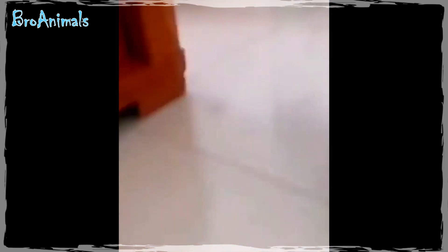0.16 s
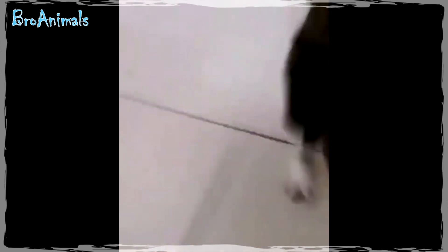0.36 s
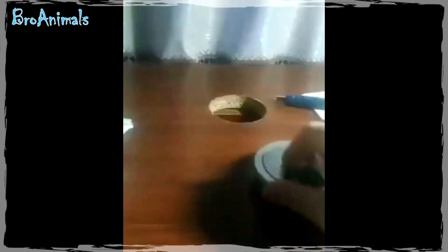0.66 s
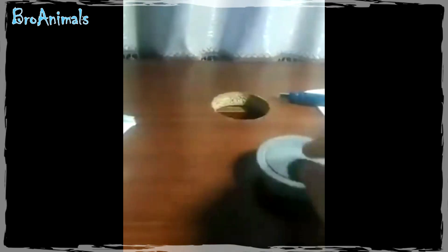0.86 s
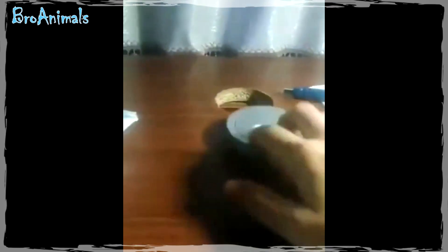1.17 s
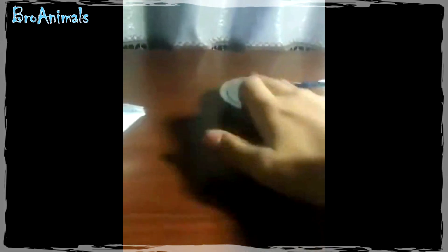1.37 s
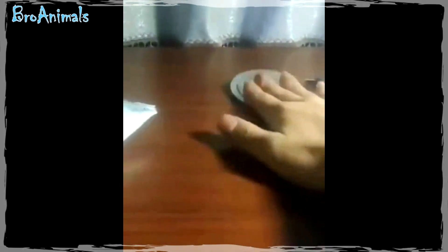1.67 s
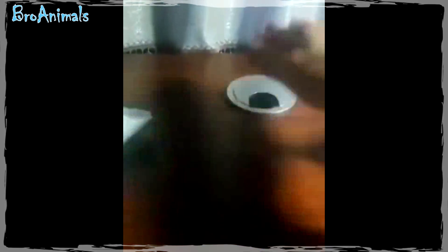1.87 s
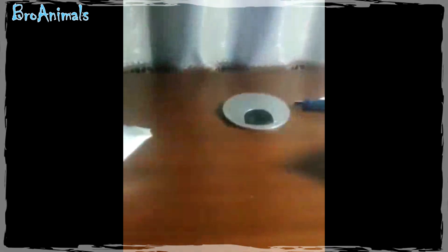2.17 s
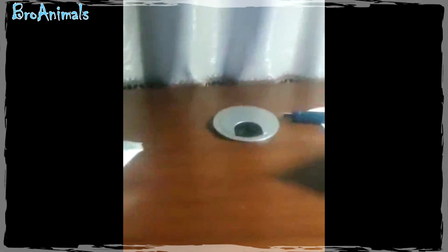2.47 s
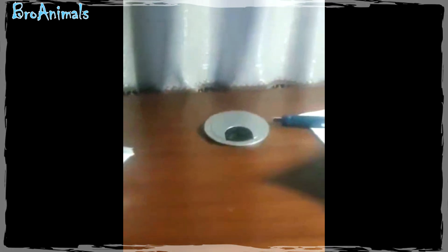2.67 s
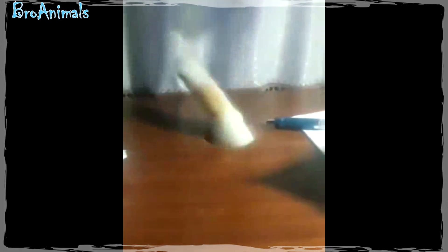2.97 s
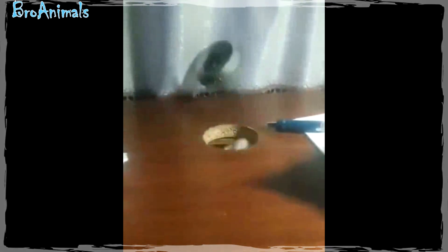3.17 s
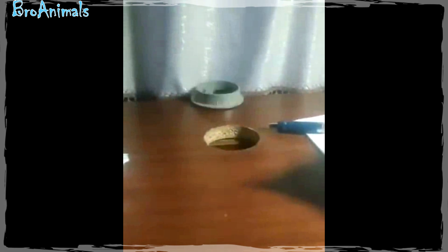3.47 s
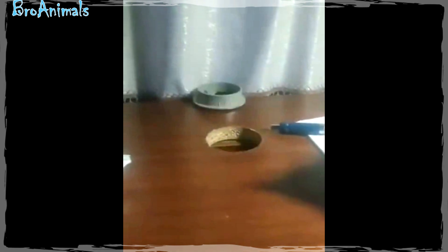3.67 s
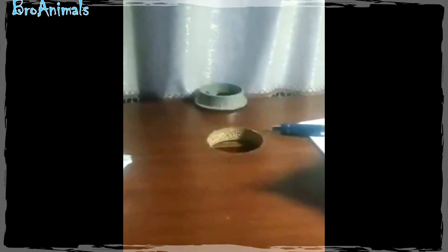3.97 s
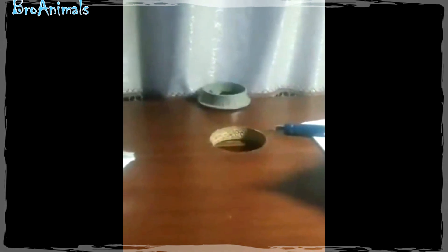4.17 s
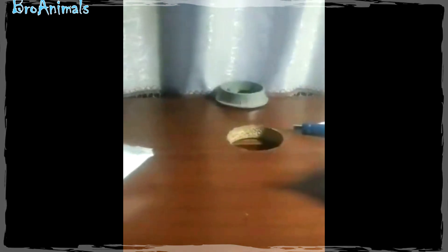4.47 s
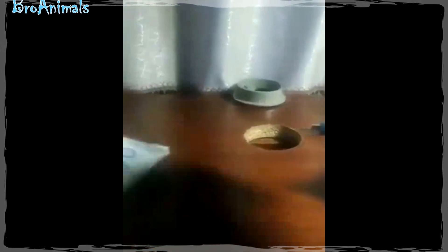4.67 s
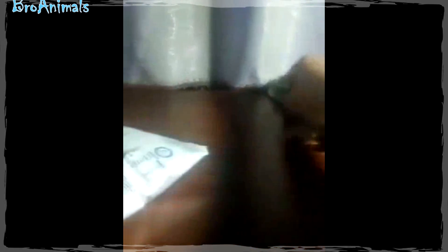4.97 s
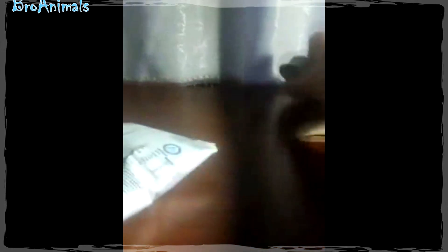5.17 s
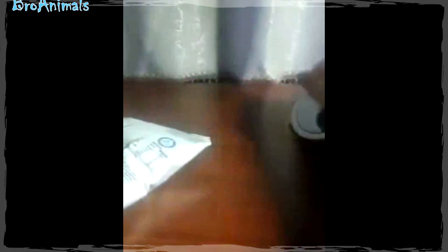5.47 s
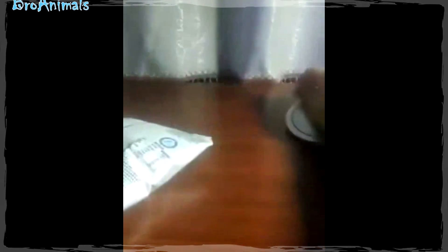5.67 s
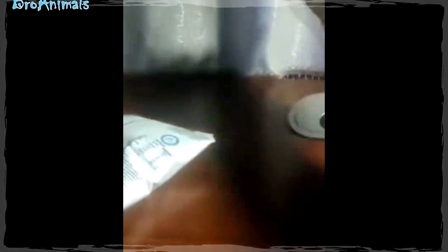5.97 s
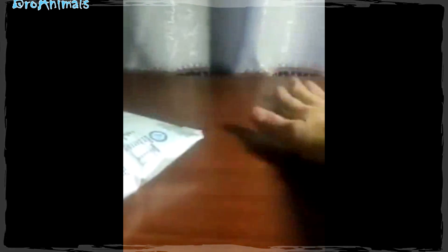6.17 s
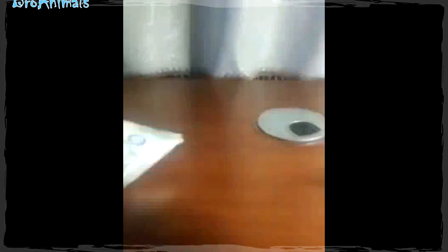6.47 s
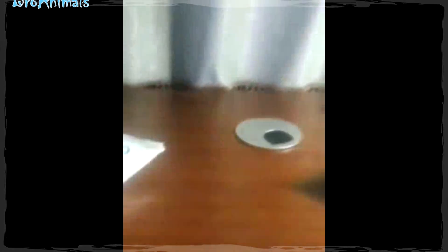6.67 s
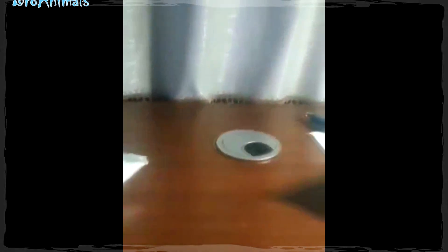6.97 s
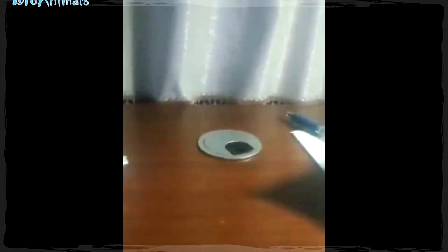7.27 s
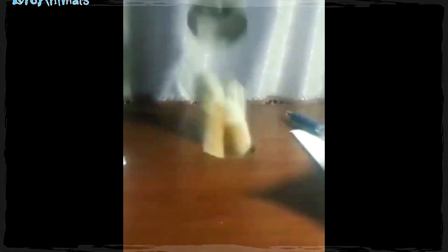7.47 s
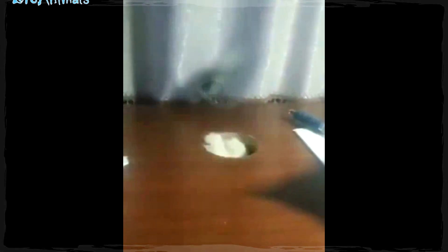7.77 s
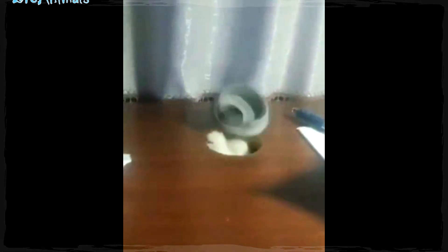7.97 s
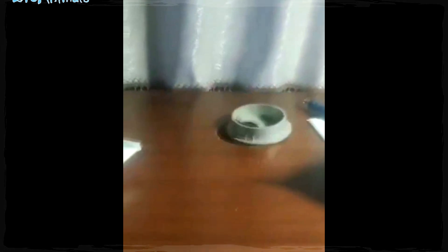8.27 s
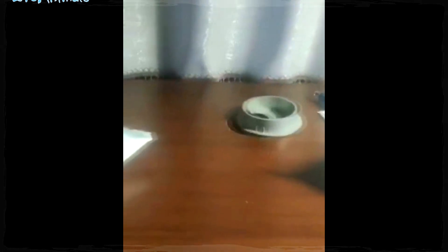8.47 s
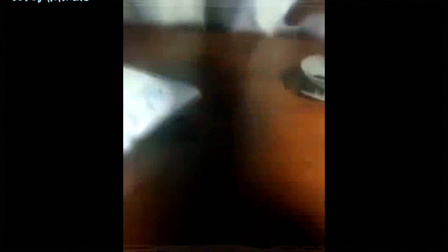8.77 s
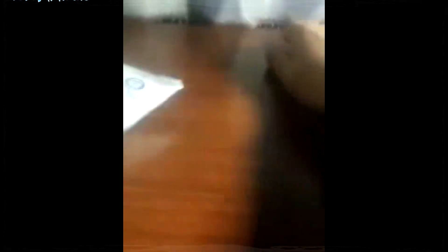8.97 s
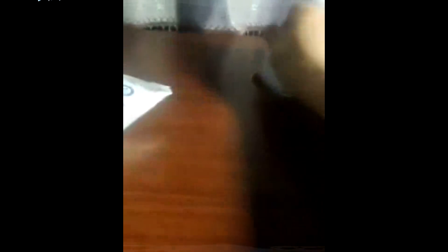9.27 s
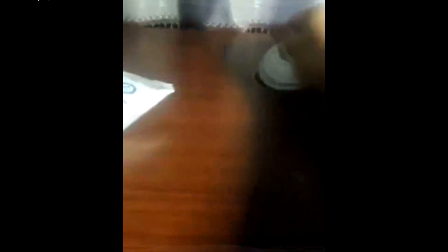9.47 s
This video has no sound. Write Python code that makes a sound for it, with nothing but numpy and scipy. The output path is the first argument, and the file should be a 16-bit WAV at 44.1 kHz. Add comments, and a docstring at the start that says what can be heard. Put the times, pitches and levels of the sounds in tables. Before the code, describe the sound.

A hollow plastic cap slides and clacks into a hole in a wooden desk, then twice gets scratched, popped out, rattles and is fetched, close in a small hard room.

```python
"""After half a second of silence a blink of room tone is heard, a second gap, then a drone and a hollow rasp:
a hand slides a plastic cable-hole cap over a wooden desk, close to a phone, and presses it into its hole.
Twice a cat's paw scratches it from below and pops it out; it bounces and rattles, and the hand fetches it.
Knocks are struck damped modes, scrapes are stick-slip noise driving such modes, the slide is filtered
stick-slip noise; a small hard room adds decaying noise and standing waves, and filtered noise is the air."""
import sys
import numpy as np
from scipy import signal
from scipy.fft import rfft, irfft
from scipy.io import wavfile
from scipy.ndimage import uniform_filter1d, minimum_filter1d, map_coordinates

SR = 44100
rng = np.random.default_rng(int(sys.argv[2]) if len(sys.argv) > 2 else 0)


def unload_wav(signal):
    """Save mono or channel-first audio to the path in sys.argv[1] as 16-bit WAV at rate SR, clipped to [-1, 1]."""
    wavfile.write(
        sys.argv[1],
        SR,
        np.round(np.clip(np.atleast_2d(signal).T, -1, 1) * 32767).astype(np.int16),
    )


N = 424241
T = np.arange(N) / SR

# Levels of events are relative; each layer adds its own trim.
# Cap meets desk: pressed home, popped out, put back, flung up again, fetched. Columns: t/s, contact length/s,
# focus/dB (lost one octave from a centre), cap level/dB, cap centre f/Hz, desk thud level/dB, thud centre f/Hz,
# skirt level/dB, rim crack level/dB, edge tick level/dB
KNOCKS = [ (1.086,0.0019,17,-17.5,1840,-21.5,330,-30.5,-31.5,-45),
          (1.123,.003,11,-29,1600,-36,380,-55,-49,-48), (1.22,0.0017,7.5,-18,1580,-21,414,-30,-26,-31.5),
          (1.301,0.0025,14,-33,982,-36,382,-59,-42,-42), (1.35,0.0021,5,-19.5,1700,-16,443,-40,-24.5,-24),
          (1.357,0.0025,17,-30.5,1500,-15,476,-39,-25,-35), (1.364,0.0022,8,-28,1100,-31,560,-43,-33,-39),
          (1.372,.002,7,-23.5,870,-16.5,272,-48,-37,-46),
          (1.532,0.0009,8,-20.5,1880,-24.5,563,-35,-25,-28.5),
          (2.065,0.0023,9.5,-47.5,880,-29.5,234,-62,-56,-41),
          (2.547,0.0028,7,-27,1700,-22,344,-33,-29.5,-25.5),
          (2.655,0.0037,2,-54,1520,-51,400,-55,-28,-22.5), (2.704,0.002,14,-26,2030,-28.5,400,-33,-28,-26),
          (2.779,0.0016,15,-36,750,-33.5,367,-50,-30,-27.5), (2.807,.002,6,-29,1210,-32,440,-38,-28,-34),
          (2.849,0.0016,13,-43,1630,-45,310,-46,-27.5,-41),
          (2.898,0.0015,12,-33,1660,-30,390,-52,-23,-31.5),
          (2.906,0.002,2,-15,1160,-18,480,-19,-24.5,-22.5),
          (3.045,0.0019,8,-19.5,1800,-26,506,-18.5,-21,-27),
          (3.064,0.0034,10,-40,1500,-26,480,-47,-35,-24.5), (3.148,0.0025,7,-31,1600,-30,400,-29,-28,-31),
          (3.151,0.0017,4,-21.5,1710,-26.5,480,-18,-23,-32),
          (3.183,0.0035,13,-29.5,1800,-26,350,-42,-38,-44),
          (3.197,0.0011,6,-23,1240,-19.5,440,-26.5,-23,-34),
          (3.205,0.0019,4,-23,750,-22.5,620,-25,-19.5,-28), (3.216,0.0018,19,-28.5,780,-26,690,-43,-37,-29),
          (3.298,0.0016,4,-32,1470,-35,458,-42,-42,-41), (4.141,.002,17,-71.5,910,-40,300,-85,-76.5,-80),
          (4.727,.003,3,-37,994,-29,377.5,-55,-57,-62), (4.766,0.00082,11,-42,1500,-24.5,410,-58,-36,-32.5),
          (4.815,0.002,5.5,-25,1802,-22.5,680,-23.5,-27.5,-34),
          (4.821,0.0014,15,-27,1600,-20.5,570,-56,-53,-53),
          (4.932,0.0024,69,-28.5,1270,-28.5,515,-44,-48,-55),
          (4.99,0.0015,6,-55,1361,-59,250.3,-43,-39,-38),
          (5.226,0.0015,8.5,-25.5,1630,-15,283,-40,-27.5,-28.5),
          (5.324,0.0028,9,-37.5,1307,-29,400,-56,-40,-45), (5.35,.002,9,-28.5,952,-21,294,-47,-37.5,-43),
          (5.398,0.0018,12,-21.5,1760,-22.5,431,-28,-21,-26), (5.412,.0015,12,-38,1790,-30,400,-45,-40,-42),
          (5.444,0.0022,7,-28.5,1210,-25,480,-46,-31.5,-36), (5.453,0.0025,9,-33,1211,-24,638,-50,-39,-41),
          (5.856,0.0029,5,-20,1602,-19,410,-25,-22,-22.5), (5.863,0.0028,11,-21,1763,-21.5,600,-29,-31,-36),
          (5.871,0.0012,2.5,-21.5,1401,-15.5,229,-35,-28,-42.5),
          (6.38,0.0025,12,-69,835,-40,318,-74,-66,-76.5), (6.583,0.0021,4,-52,741,-33,233.2,-57,-50,-42),
          (7.166,0.0027,7,-25,1514,-24.5,345,-34,-26.5,-27),
          (7.174,0.0012,0,-26,1420,-27.5,646,-49,-38,-37), (7.187,0.00088,6,-56,1611,-42,400,-54,-32,-30),
          (7.339,.0017,1,-32.5,1708,-36,417,-44,-28,-36),
          (7.345,0.00082,16,-29.5,1608,-32,420,-48,-26.5,-36),
          (7.454,0.0019,1,-25,1212,-29,370,-44,-27.5,-42), (7.566,.0016,4.5,-19.5,1120,-19,490,-24,-19,-26),
          (7.577,.002,9,-22.5,900,-26,326.2,-50,-45,-45), (7.594,0.0015,9,-19,778,-22,440,-50,-30,-28.5),
          (7.718,0.0016,7.5,-18,1551,-24,420,-22.5,-27.5,-24.5),
          (7.739,0.0037,11,-23.5,1580,-26,385,-43,-34,-32), (7.754,0.0019,8,-27,1548,-22,380,-44,-43,-29),
          (7.772,0.0023,13,-18.5,1580,-20.5,520,-36,-33,-39),
          (7.851,0.0019,7,-21.5,1205,-18,380,-43,-33,-35), (7.86,0.0016,21,-24,877,-18.5,430,-49,-37,-48),
          (7.906,0.0029,6,-22,1150,-19,350,-50,-40,-38),
          (7.928,0.0014,7.5,-18,1010,-19.5,413,-27.5,-24.5,-24.5),
          (8.016,0.0021,10,-29,1750,-26,351,-41,-49.5,-48.5),
          (8.042,0.0024,1.5,-26,1212,-29.5,420,-37,-48,-38.5),
          (8.059,0.0028,2,-22.5,792,-25,470,-34.5,-35.5,-38.5),
          (8.547,0.0013,10,-45,1501,-38,320.4,-57,-34,-27.5), (8.56,0.004,1,-31.5,1592,-33,280,-45,-37,-45),
          (8.65,0.0014,8,-30,1600,-43,400,-42,-27,-30), (8.655,0.0019,1,-27,1210,-23,503,-28.5,-27.5,-33),
          (8.668,.002,6,-28,1400,-23,308,-31,-47,-42), (8.707,0.0028,9,-28,752,-21.5,369.4,-37,-44,-48),
          (8.8,.002,28,-34.5,1310,-51,400,-50,-49,-26), (8.955,0.0027,5,-25.5,850,-13.5,404,-59,-36,-32.5),
          (8.973,0.0016,9,-26,950,-12.5,463,-56,-33.5,-42), (9.021,0.0024,6,-47,900,-33,399,-52,-38,-37),
          (9.059,0.0029,6,-35,1262,-24.5,319.8,-52,-36,-29),
          (9.109,0.0021,10,-33.5,1156,-21,335,-53,-40,-41),
          (9.221,.0016,8,-27,1432,-20.5,344.4,-42,-29,-33),
          (9.372,0.0017,11,-24,1348,-20.5,400,-45,-29.5,-38),
          (9.429,0.0046,11,-23.5,950,-23.5,411,-55,-33,-44),
          (9.446,0.0014,7,-27,1006,-26,301.5,-34,-28,-39), (9.497,0.0019,15,-32,1148,-34,546.6,-44,-56,-48),
          (9.506,0.0017,22,-29,1140,-36,546,-58,-50,-52)]
# Strokes of claws, fingers and rim. Columns: start t/s, length/s, cap level/dB, cap centre f/Hz,
# desk rumble level/dB, rumble centre f/Hz, edge hiss level/dB
SCRAPES = [ (0.787, 0.098, -23.5, 1310, -26, 250, -48), (0.937, 0.12, -20.5, 1240, -27, 454, -58),
           (1.337, 0.044, -29, 1500, -29, 480, -38), (2.033, 0.15, -46.5, 1220, -40.5, 230, -50.5),
           (2.606, 0.083, -45, 2830, -59, 240, -43), (2.691, 0.12, -30, 1900, -44, 322, -33.5),
           (2.833, 0.026, -26, 3670, -32, 342, -29), (2.925, 0.16, -20.5, 1000, -23, 233, -46),
           (3.051, 0.12, -27.5, 1300, -28, 300, -38.5), (3.248, 0.16, -43, 895.5, -26, 260, -71),
           (4.6, 0.33, -40, 2744, -47.5, 217.4, -46.5), (4.889, 0.097, -25, 1210, -26, 576, -37.5),
           (5.407, 0.1, -23.5, 1000, -20, 383, -39.5), (5.002, 0.39, -57, 2400, -65, 260, -56),
           (5.673, 0.18, -48, 2800, -56.5, 259.6, -57.5), (5.881, 0.19, -28, 1179, -20.5, 188, -57),
           (5.562, 0.1, -35, 1480, -27.5, 285, -52), (6.594, 0.096, -35.5, 1309, -38, 252, -45),
           (6.743, 0.077, -44, 1257, -40.5, 235, -51), (7.161, 0.028, -27, 2776, -43, 223, -28),
           (7.342, 0.059, -31, 815, -22, 304, -32.5), (7.394, 0.069, -32, 2000, -27, 328.4, -28),
           (7.627, 0.1, -23, 909.2, -24, 375, -40), (7.786, 0.044, -20, 3200, -28.5, 299.7, -32.5),
           (7.965, 0.059, -24.5, 728.6, -30, 247.6, -41), (8.608, 0.15, -27.5, 1440, -29.5, 318, -37.5),
           (8.765, 0.071, -45, 1303, -39, 229.9, -39), (8.791, 0.025, -24.5, 1400, -41, 301.4, -35),
           (8.975, 0.13, -28.5, 830, -44, 270, -43.5), (9.19, 0.045, -31, 1297, -16.5, 260.6, -41),
           (9.335, 0.041, -38, 920, -23.5, 328.4, -52), (9.384, 0.072, -29.5, 1000, -20, 380, -45),
           (9.456, 0.077, -32, 1096, -26.5, 307.6, -45)]
# The hand pushes the cap flat over the wood. Columns: start t/s, stop t/s, rasp level/dB, desk rumble level/dB
PUSHES = [(0.66, 1.06, -25.5, -29.5), (1.066, 1.222, -30, -26), (1.288, 1.333, -21.5, -17.5)]

# Modes of the cap's flat face. Columns: f/Hz, level/dB
FACE_MODES = [(750, -4), (882, -4.5), (1010, -6.5), (1190, -3.5), (1445, -3.5), (1605, -2), (1720, -3),
              (1840, -1), (2100, 0.5), (2520, -2.5)]
# Modes of the cap's skirt, which rings when no hand or hole holds it. Columns: f/Hz, level/dB
SKIRT_MODES = [(2600, -2), (3010, 3), (3160, -8.5), (3400, -1.5), (3850, -4), (4340, -14.5), (4957, -11.5)]
# Modes of the desk top. Columns: f/Hz, level/dB
DESK_MODES = [(205, -6), (236, -3.5), (258, -3), (325, -5.5), (355, -4), (400, 0.5), (470, -4.5), (520, -3),
              (574, -2), (675, 0), (742, 2)]
# Spectrum of the struck rim. Columns: f/Hz, level/dB
RIM_CRACK = [(500, -33), (1700, -9), (2500, -0.5), (3010, -4.5), (3400, -5), (4300, -2), (4957, -1.5),
             (5600, -6.5), (9000, -17.5)]
# Spectrum of the struck edge. Columns: f/Hz, level/dB
EDGE_TICK = [(1000, -15), (4000, -20.5), (5600, -9.5), (6800, 0), (8000, -0.5), (9100, -9), (10500, 1.5),
             (14000, -8.5)]
# Spectrum of the cap's thin edge when scraped. Columns: f/Hz, level/dB
EDGE_HISS = [(2500, -7.5), (3500, -6), (4400, -6.5), (5600, -8), (6800, -7), (8000, -8.5), (9100, -12),
             (10500, -10.5), (14000, -14)]
# Spectrum of the gliding cap's hollow. Columns: f/Hz, level/dB
SLIDE_HOLLOW = [(500, -35), (720, -6.5), (900, 0), (1050, -5), (1300, -33)]
# Spectrum of the gliding rim. Columns: f/Hz, level/dB
SLIDE_RASP = [(900, -36), (1250, -8), (1560, -1.5), (1780, 1.5), (2150, -14.5), (2550, 0), (2850, -23),
              (3150, -11.5), (4000, -32)]
# Spectrum of the rubbed desk. Columns: f/Hz, level/dB
DESK_RUMBLE = [(100, -25.5), (160, -17.5), (230, 4.5), (290, 4.5), (390, 7.5), (500, -10), (700, -4),
               (950, -17)]

# Decay of the diffuse echo. Columns: f/Hz, t60/s
ROOM_T60 = [(100, 1.4), (220, 0.5), (400, 0.435), (1500, .5), (4000, 0.51), (7000, 0.46), (12000, 0.63)]
# Spectrum of the diffuse echo. Columns: f/Hz, level/dB
ROOM_COLOUR = [(100, -8), (220, -2), (400, -1), (800, -2), (1600, -2.5), (4000, -2.5), (7000, -2.5),
               (12000, -6.5)]
# Standing waves of the room. Columns: f/Hz, t60/s, level/dB
ROOM_MODES = [(199, .55, 1.5), (217.7, 0.29, 3), (237.2, .4, 3), (257.5, 0.37, 5.5), (333.7, 0.24, -3),
              (353, 0.26, -6), (397.6, 0.42, 1.5), (421, 0.25, -2), (571, 0.32, 0), (680, 0.25, 2),
              (737, .4, 2), (901, .4, 0.5)]
# Spectrum of the indoor drone and hiss. Columns: f/Hz, level/dB
AIR = [(24, -89), (40, -57), (140, -18), (170, -3), (192, 0.5), (239, -1.5), (264, -12), (363, -13),
       (476, -17.5), (721, -20.5), (1020, -22), (1400, -27), (7590, -29), (9460, -29), (14000, -73.5)]
# Spans in which sound is let through, with silence outside. Columns: from t/s, to t/s
LIVE = [(.548, .575), (.697, 9.7)]

DESK_Q, CAP_Q, SKIRT_Q = 8, 13, 26  # wood and soft plastic ring for few cycles
CAP_DETUNE = .012  # the grip shifts the cap's modes by this share
STROKE_RISE, STROKE_FALL = 0.13, 0.31  # shares of a stroke spent speeding up and stopping
GRIP_DB, GRIP_PER_S = 3, 100  # the grip tightens and loosens at random
GRIP_SHIFT_S = .03  # a rubbed body answers with a new mix of its modes about this often
PUSH_START_SHARE = 0.34  # speed at the outset, as a share of full speed
PUSH_SPEEDUP_S, PUSH_EDGE_S = 0.28, 0.041  # time constant of speeding up; smoothing of start and stop
SLIDE_WANDER, SLIDE_FLICKER_DB = .035, 2  # wander of the resonances, as a share, and of their level
TOP_HZ = 15800  # next to no sound above this frequency


def knocks(cap_db, thud_db, skirt_db, crack_db, tick_db):
    """Impact excitation: each contact ticks the edge, cracks the rim and rings face, skirt and desk top."""
    out, t = np.zeros(N), T[:SR // 12]
    for (s, contact_s, focus_db, face_level, face_hz, desk_level, desk_hz,
         skirt_level, rim_level, edge_level) in KNOCKS:
        face, desk = bodies(t, FACE_MODES, face_hz, desk_hz, focus_db, focus_db, contact_s)
        skirt = ring(SKIRT_MODES, t, SKIRT_Q, centre_hz=3200, focus_db=2.5, scatter_db=-0.5, detune=0.0081)
        skirt = skirt * (1 - np.exp(-t / contact_s))
        rim = chatter(RIM_CRACK, t, contact_s)
        edge = chatter(EDGE_TICK, t, contact_s)
        add(out, s, blow(face, face_level + cap_db))
        add(out, s, blow(desk, desk_level + thud_db))
        add(out, s, blow(skirt, skirt_level + skirt_db))
        add(out, s, blow(rim, rim_level + crack_db))
        add(out, s, blow(edge, edge_level + tick_db))
    return out


def bodies(t, cap_modes, cap_hz, desk_hz, cap_focus_db, desk_focus_db, contact_s):
    """Modal response: one tap sets off the cap, with a little grit, and the slower desk top."""
    grit = rng.standard_normal(len(t)) * np.exp(-t / 0.0078)
    cap = ring(cap_modes, t, CAP_Q, cap_hz, cap_focus_db, scatter_db=4.0, detune=CAP_DETUNE)
    cap = cap + 0.16 * grit
    desk = ring(DESK_MODES, t, DESK_Q, desk_hz, desk_focus_db, scatter_db=1.5, detune=0.0058)
    return cap * (1 - np.exp(-t / contact_s)), desk * (1 - np.exp(-t / 0.0038))


def ring(modes, t, q, centre_hz, focus_db, scatter_db, detune):
    """Modal superposition: damped sines, favoured near a centre and shifted a little by spot and grip."""
    hz, db = np.transpose(modes)
    size, shift = rng.standard_normal((2, len(hz)))
    octaves_off = np.log2(hz / centre_hz)
    gain = undb(db + scatter_db * size - focus_db * octaves_off ** 2)
    phase = 2 * np.pi * np.outer(hz * (1 + detune * shift), t)
    start_phase = 2 * np.pi * rng.random((len(hz), 1))
    decay = np.exp(-phase / (2 * q))
    return gain @ (np.sin(phase + start_phase) * decay)


def chatter(points, t, length_s):
    """Repeated micro-impact: hard plastic buzzes on the wood for a few milliseconds as it lands."""
    burst = rng.standard_normal(len(t)) * t * np.exp(-t / length_s)
    return colour(burst, points)


def blow(x, db):
    """Level by early energy: set the rms of the first 20 ms."""
    return x * undb(db) / np.sqrt(np.mean(x[:SR // 50] ** 2))


def scrapes(rasp_db, rumble_db, hiss_db):
    """Friction excitation: slips swell, hold and stop, driving cap and desk at a contact that moves along."""
    out, t = np.zeros(N), T[:SR // 16]
    edge = colour(1. * (t == 0), EDGE_HISS)
    slips = friction(N, slips_per_s=8000, spread_db=0.5) * undb(GRIP_DB * walk(GRIP_PER_S))
    for start_s, length_s, cap_level, cap_hz, desk_level, desk_hz, edge_level in SCRAPES:
        progress = np.linspace(0, 1, int(length_s * SR))
        speed = np.minimum(1, np.minimum(progress / STROKE_RISE, (1 - progress) / STROKE_FALL))
        force = unit(slips[int(start_s * SR):][:len(speed)] * speed)
        spots = np.linspace(0, 1, int(length_s / GRIP_SHIFT_S) + 1)
        for spot in np.eye(len(spots)):
            # neighbouring spots cross-fade at constant power
            push = force * np.sqrt(np.interp(progress, spots, spot))
            cap, desk = bodies(t, FACE_MODES + SKIRT_MODES, cap_hz, desk_hz,
                               cap_focus_db=6.5, desk_focus_db=5, contact_s=0.00063)
            layers = [(cap, cap_level + rasp_db), (desk, desk_level + rumble_db), (edge, edge_level + hiss_db)]
            for body, db in layers:
                sound = signal.fftconvolve(push, body)
                same_energy = np.linalg.norm(push) / np.linalg.norm(sound)
                add(out, start_s, sound * undb(db) * same_energy)
    return out


def friction(count, slips_per_s, spread_db):
    """Stick and slip: tiny jolts of uneven size at random moments."""
    spread = spread_db * np.minimum(rng.exponential(size=count), 4)
    size = undb(spread) * rng.standard_normal(count)
    return size * (rng.random(count) < slips_per_s / SR)


def slide(hollow_db, rasp_db, rumble_db):
    """Damped sliding friction: the hand dulls the cap to a hollow rasp that grows as a push gathers speed."""
    force = friction(N, slips_per_s=1000, spread_db=2.5) * undb(2.5 * walk(70))
    rim_drive, desk_drive = np.zeros((2, N))
    for start_s, stop_s, rim_level, desk_level in PUSHES:
        t = T[:int((stop_s - start_s) * SR)]
        speed = 1 - (1 - PUSH_START_SHARE) * np.exp(-t / PUSH_SPEEDUP_S)
        add(rim_drive, start_s, speed * undb(rim_level))
        add(desk_drive, start_s, speed * undb(desk_level))
    out = np.zeros(N)
    for points, drive, db in [(SLIDE_HOLLOW, rim_drive, hollow_db), (SLIDE_RASP, rim_drive, rasp_db),
                              (DESK_RUMBLE, desk_drive, rumble_db)]:
        envelope = uniform_filter1d(drive, int(PUSH_EDGE_S * SR) + 1)
        out += rock(colour(force, points)) * undb(db) * envelope
    return out


def rock(x):
    """Modulated resonance: the cap rocks under the fingers, so pitch wanders and level flickers."""
    place = np.cumsum(1 + SLIDE_WANDER * walk(14))
    wandering = map_coordinates(x, [place], order=1, mode="mirror")
    return unit(wandering * undb(SLIDE_FLICKER_DB * walk(35.9)))


def contacts():
    """Directivity: knocks and scrapes with one random mix of modes, as radiated in one direction."""
    struck = knocks(cap_db=-2.0, thud_db=-0.5, skirt_db=-3.5, crack_db=-4.0, tick_db=-0.5)
    return struck + scrapes(rasp_db=-9.5, rumble_db=-7.5, hiss_db=1.05)


def room(x, wet_db, build_s, linger):
    """Reverberation: bare walls and a tiled floor give a dense echo whose decay time depends on frequency."""
    t = T[:SR]
    hz = np.arange(SR // 2 + 1)
    noise = rfft(rng.standard_normal(SR))
    octaves = np.log2(hz + 1)
    centres = np.log2(np.array(ROOM_T60)[:, 0])
    tail = np.zeros(SR)
    for share, (_, t60) in zip(np.eye(len(centres)), ROOM_T60):
        band = irfft(noise * np.interp(octaves, centres, share))
        tail += band * undb(-60 * (t / t60) ** linger)  # linger below 1: steeper first, slower later
    tail = tail * (1 - np.exp(-t / build_s))
    diffuse = colour(tail / np.linalg.norm(tail), ROOM_COLOUR)
    return signal.fftconvolve(x, diffuse + standing_waves(t))[:N] * undb(wet_db)


def standing_waves(t):
    """Room resonance: the low modes each die exponentially at their own pace."""
    hz, t60, db = np.transpose(ROOM_MODES)
    damping = np.log(1000) / t60
    phase = 2 * np.pi * (np.outer(hz, t) + rng.random((len(hz), 1)))
    gain = undb(db) * 2 * damping / SR
    return gain @ (np.sin(phase) * np.exp(-np.outer(damping, t)))


def air(level_db):
    """Stationary noise: a quiet, steady indoor drone under a fine hiss."""
    return unit(colour(rng.standard_normal(N), AIR)) * undb(level_db)


def undb(db):
    """Logarithmic level: decibels to amplitude gain."""
    return 10 ** (np.asarray(db) / 20)


def unit(x):
    """Normalization: scale to an rms of 1."""
    return x / np.sqrt(np.mean(x ** 2))


def on_log_axis(hz, points):
    """Logarithmic interpolation: read (f/Hz, value) points at the given frequencies."""
    f, value = np.transpose(points)
    return np.interp(np.log(hz + 1), np.log(f), value)


def colour(x, points):
    """Minimum-phase filtering: a folded cepstrum makes the (f/Hz, level/dB) response causal."""
    size = 4096
    log_gain = on_log_axis(np.arange(size // 2 + 1) * SR / size, points) * np.log(10) / 20
    cepstrum = irfft(log_gain)
    cepstrum[1:size // 2] *= 2
    cepstrum[size // 2 + 1:] = 0
    impulse = irfft(np.exp(rfft(cepstrum)))
    return signal.fftconvolve(x, impulse)[:len(x)]


def walk(rate):
    """Band-limited chance: normal random values, rate of them a second, joined by straight lines."""
    steps = rng.standard_normal(size=4096)
    return np.interp(T * rate, np.arange(len(steps)), steps)


def add(out, s, x):
    """Superposition: mix x into out from time s."""
    start = int(s * SR)
    out[start:start + len(x)] += x[:N - start]


def scene():
    """Directivity in a room: walls get other mixes of modes, so the echo is smoother than the direct sound."""
    gliding = slide(hollow_db=-4.5, rasp_db=-7.0, rumble_db=-3)
    near = contacts() + gliding
    behind = contacts() + gliding
    echo = sum(room(x, wet_db=-5.5, build_s=0.00018, linger=0.91) for x in (near, behind))
    return (near + echo + air(level_db=-49))[None]


def suppressor(x, threshold_db, depth_db):
    """Downward expansion: quiet sound is lowered by up to the depth, which shortens the ends of the echoes."""
    power = np.abs(uniform_filter1d(x ** 2, size=1764))  # 40 ms mean
    return x * undb(-depth_db / (1 + power / undb(threshold_db) ** 2))


def limiter(x, ceiling_db, hold_s):
    """Peak limiting: the gain falls just ahead of each peak above the ceiling and returns soon after."""
    size = int(hold_s * SR) + 1
    gain = np.minimum(1, undb(ceiling_db) / (np.abs(x) + 1e-9))
    return x * uniform_filter1d(minimum_filter1d(gain, size), size)


def record(dry):
    """Transduction: the phone thins bass, lowers quiet noise and limits peaks. Apart from that, the treble
    fades steeply above 10 kHz."""
    # columns: f/Hz, level/dB
    response = [(30, -10.5), (110, -4.5), (150, -4.5), (195, -0.5), (9300, -1.0), (9900, -10.0),
                (10300, -17.5), (11000, -27.5), (13500, -24.5), (15500, -42.5)]
    sound = suppressor(colour(dry[0], response), threshold_db=-36.0, depth_db=6.0)
    sound = limiter(sound, ceiling_db=-2.8, hold_s=.006)
    sound = sound * sum((T >= start) & (T < stop) for start, stop in LIVE)
    low_pass = signal.ellip(8, .2, 70, TOP_HZ, fs=SR, output="sos")
    return signal.sosfilt(low_pass, sound)[None]


dry = scene()
out = record(dry)
unload_wav(out)
```